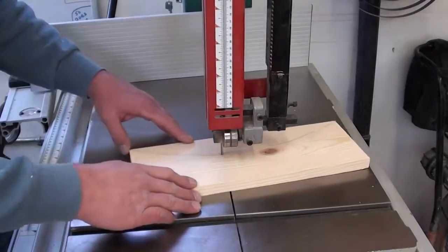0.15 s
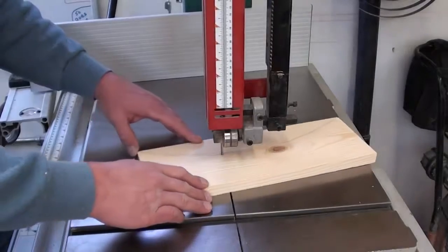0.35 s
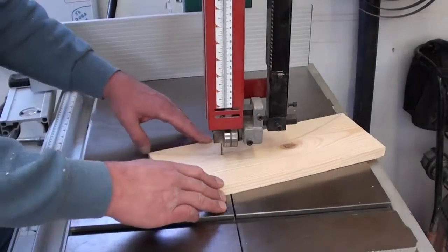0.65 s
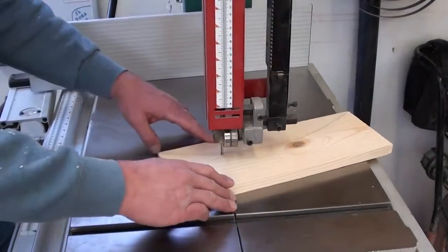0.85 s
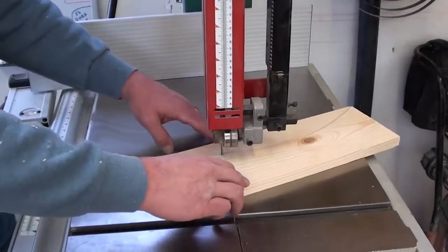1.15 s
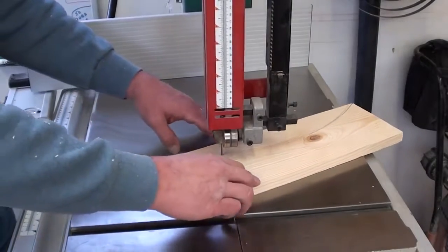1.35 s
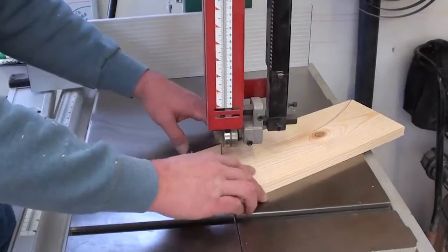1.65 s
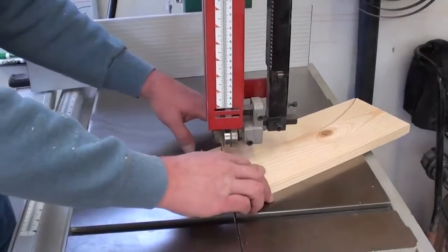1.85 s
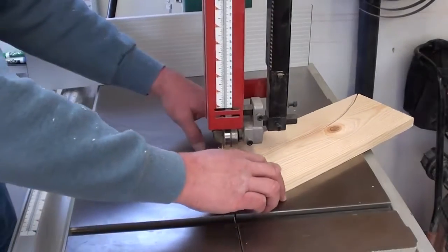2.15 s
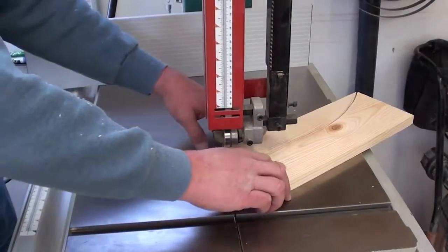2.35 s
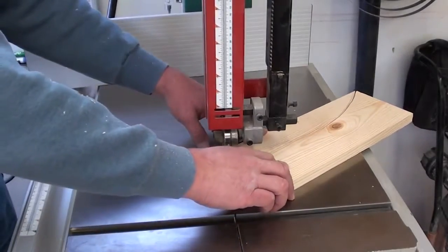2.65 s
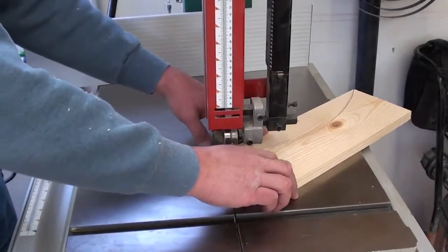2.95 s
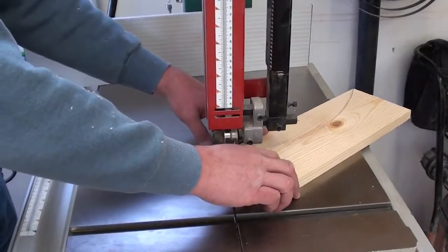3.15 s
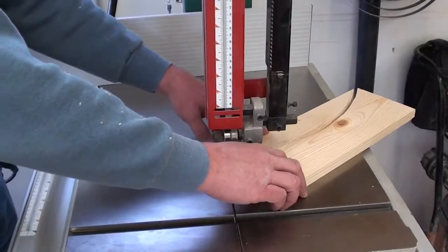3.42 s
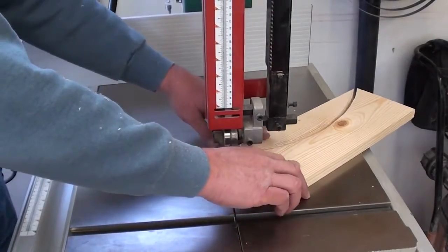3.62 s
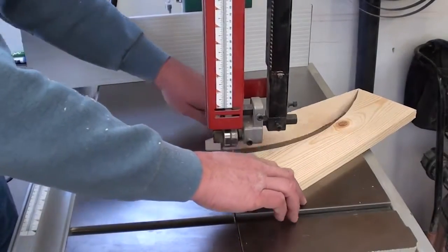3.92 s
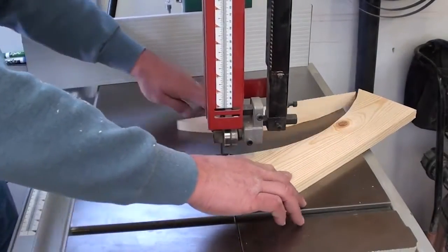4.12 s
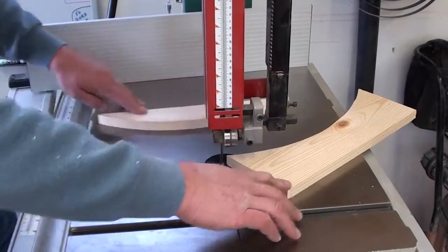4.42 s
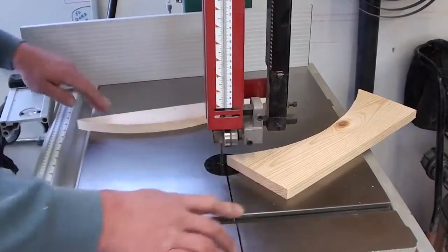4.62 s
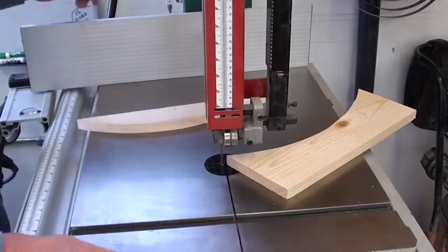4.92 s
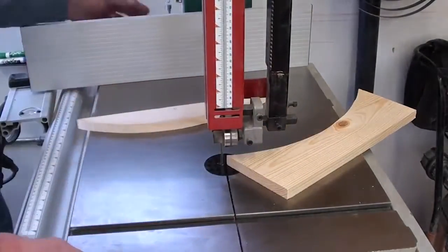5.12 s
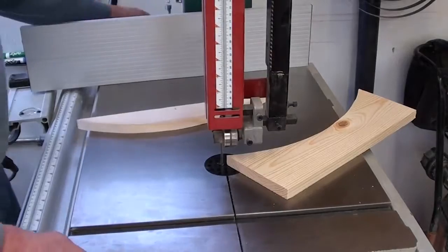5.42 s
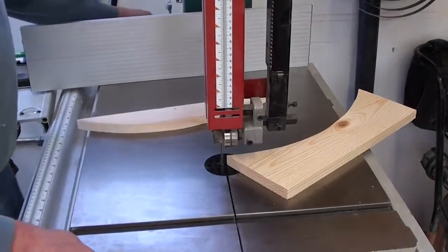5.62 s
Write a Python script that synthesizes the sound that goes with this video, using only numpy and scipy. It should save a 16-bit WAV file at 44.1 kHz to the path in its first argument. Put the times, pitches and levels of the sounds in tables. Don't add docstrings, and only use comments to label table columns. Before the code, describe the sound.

Near microphone, almost mono, lightly reflective workshop. First a speeded-up bandsaw whines and hisses harshly, with binding squeals growing stronger. An abrupt change brings true-speed sawing, lower and rougher, with small grainy crackles. After the cut ends, the motor hums more openly under fluttering blade hiss, wood rubs softly on metal, and finally a switch knocks heavily.

```python
import sys
import numpy as np
from scipy import signal
from scipy.fft import rfft, irfft, next_fast_len
from scipy.io import wavfile

SR = 44100
rng = np.random.default_rng(int(sys.argv[2]) if len(sys.argv) > 2 else 0)


def gain_from_decibels(decibels):
    exponent = np.asarray(decibels, float) / 20
    return 10 ** exponent


def materialize(psi):
    bounded = np.clip(np.atleast_2d(psi).T, -1, 1)
    quanta = np.round(bounded * 32767).astype(np.int16)
    wavfile.write(sys.argv[1], SR, quanta)


N = 254451

FAST_SPEED, NORMAL_SPEED = 4.9735, 1
SPLICE_S, EXIT_S, OFF_S = 2.2972, 3.24, 5.59
HUM_HZ = 119.925
TOOTH_HZ, GUIDE_HZ, LOOP_HZ, WHEEL_HZ = 682, 77.4, 2.38, 47.5
KERF_SPLIT_HZ, KERF_WIDTH_HZ = 13800, 380
KERF_SHOVE = 2.8

# multiple [of HUM_HZ], level_db [dB re the 4th]
HUM_HARMONICS = [(1, -26), (2, -24), (3, -23), (6, -24), (7, -35), (8, -20), (9, -31), (10, -35), (11, -39)]
# time_s [s], fourth_db [dB]
MACHINE_LEVEL = [(0.0, -26.5), (0.55, -28), (0.95, -25.5), (1.3, -24), (1.62, -22), (2.29, -23.5)]
# true_hz [Hz], width_hz [Hz], fast_db [dB], normal_db [dB]
FRAME_MODES = [(99.4, 11, -36, -42), (141.2, 7.9, -21.5, -16), (155, 9.3, -21.5, -15.5),
               (244, 17, -16.5, -13), (272, 21, -26, -7), (305, 11, -15, -12), (308, 6.5, -11, -21),
               (327.7, 21, -13, -18), (443, 8.2, -14, -15.5), (500.8, 34, -4.5, 0.5), (550, 51, -16, -13.5),
               (616.6, 38, -10, -3), (675, 23, -11, -32), (724, 31, -59, -14)]
# true_hz [Hz], fast_db [dB], normal_db [dB]
FRAME_BED = [(8, -40, -30), (40, -42.5, -38), (99, -37, -31.5), (202, -32, -24), (420, -23, -16),
             (826, -30.5, -16.5), (1270, -28, -47), (2450, -60, -55.5)]
# true_hz [Hz], fast_db, normal_db [dB re the frame level]
SHAFT_TONES = [(235.3, -11, -10), (267.6, -30, -11), (298.3, -21, -8), (325.5, -17, -15), (661.2, -15, -8)]
# multiple [of TOOTH_HZ], level_db [dB re the cut]
TOOTH_HARMONICS = [(2, -16.5), (3, -32), (4, -22), (5, -15.5), (6, -18), (7, -20), (8, -18), (10, -16),
                   (15, -38)]
# time_s [s], cut_db [dB]
FEED_LEVEL = [(0.0, -37), (0.6, -39), (1.2, -36), (1.5, -32.5), (1.9, -30), (2.15, -27.5), (2.29, -29)]
# centre_s [s], length_s [s], level_db [dB]
SHOVES = [
    (0.01, 0.026, 0),
    (0.098, 0.018, 2),
    (0.197, .05, 4.5),
    (0.68, 0.02, 3.5),
    (0.783, 0.02, 1.5),
    (1.595, 0.023, -7),
]

# pitch_hz [Hz], width_hz [Hz], level_db [dB]
FAST_LOW_BED = [(2060, -21), (3500, 8), (3740, -4), (4570, -4), (4950, -1), (6220, -5.5), (7310, -3),
                (8300, -1), (10800, -64), (18300, -120)]
FAST_LOW_MODES = [(4770, 15, -3), (4900, 40, 2), (5300, 60, 3), (6740, 56, -29), (7460, 160, 7)]
FAST_RING_BED = [(4590, -17), (7800, 1.5), (8110, 0.5), (8640, 0.5), (9030, 3), (10000, 5.5), (10700, -6),
                 (11900, -6), (15500, -32), (22000, -120)]
FAST_RING_MODES = [(8110, 86, -8), (8900, 170, 10.5), (8900, 58, -13), (9660, 89, -11), (10200, 57, 10)]
FAST_SQUEAL_BED = [(6760, -29), (11500, -5.5), (12900, -11), (13300, -2), (13700, -10), (14400, -10)]
FAST_SQUEAL_MODES = [(12800, 330, -3), (14100, 29, -10)]
FAST_TOP_BED = [(8290, -44), (14100, -10), (15500, -1)]
FAST_TOP_MODES = [(14300, 200, -1), (15000, 81, -2), (15300, 60, 0), (15500, 80, 0)]

# time_s [s], pitch_hz [Hz], level_db [dB]
KERF_GLIDE = [(0.0, 15300, -35), (0.3, 15400, -40), (0.55, 15300, -39), (0.7, 15300, -33),
              (0.82, 13200, -34), (1.0, 13100, -28), (1.2, 13400, -27.5), (1.3, 13100, -26),
              (1.5, 12840, -26), (1.7, 12800, -30.5), (1.88, 12900, -31), (2.05, 12800, -30),
              (2.17, 12400, -29.5), (2.29, 12200, -25)]
# centre_s [s], length_s [s], pitch_hz
# [Hz], width_hz [Hz], level_db [dB]
FAST_FLARES = [(1.02, .18, 4910, 40, -43), (1.66, .04, 5180, 30, -39), (1.45, .07, 5170, 30, -43),
               (1.56, .04, 5060, 30, -39), (1.5, .14, 4900, 35, -41), (1.83, .08, 4900, 30, -40),
               (2.05, .12, 4880, 50, -40), (1.05, .1, 5170, 40, -45), (.19, .03, 5400, 25, -43),
               (.2, .03, 5030, 20, -41), (.53, .035, 5060, 20, -41), (.1, .12, 14130, 30, -43),
               (.75, .15, 15250, 200, -36), (1.05, .15, 14420, 80, -40), (2.2, .1, 11400, 300, -36),
               (2.12, .08, 6000, 1200, -36), (1.64, .1, 2510, 60, -29), (1.5, .12, 1620, 30, -41),
               (1.82, .06, 1620, 30, -40)]
# start_s [s], end_s [s], pitch_hz [Hz], level_db [dB], overtone_db [dB]
SQUEALS = [
    (0.208, .57, 2553, -29, -17.5),
    (.85, 1.15, 2503, -35, -22),
    (1.524, 1.78, 2533, -29.5, -11),
    (4.062, 4.414, 1570, -38, -24),
]

# time_s [s], share [0-1]
BITE = [
    (2.3, 0.95),
    (3.36, 1),
    (3.47, 0.07),
    (5.77, 0.06),
]
# pitch_hz [Hz], width_hz [Hz], level_db [dB]
BOARD_BED = [(530, 31), (900, -10), (1330, -10), (1610, -6), (1990, -1.5), (2650, -4.5), (3060, -6),
             (3310, -8), (4300, 0), (5590, -22), (9460, -120)]
BOARD_MODES = [(1470, 14, -9), (1984, 32, -2), (2267, 25, 5), (2528, 130, -3.5), (3425, 20, 0),
               (3350, 130, -18)]
TABLE_BED = [(530, -16), (900, -2), (980, -16), (1010, -2), (1460, -6), (1970, -1), (2150, -10),
             (2600, -8.5), (3250, -6), (4300, -4), (5590, -29), (9460, -120)]
TABLE_MODES = [(2038, 21, 1), (2457, 48, -2.5), (3440, 260, -9), (3620, 23, -7)]
GUIDE_BED = [(2180, -40), (3700, -14), (3930, -11.5), (4260, -3.5), (4710, -2), (5360, -2), (6030, -6),
             (6400, -5), (8320, -25), (14100, -120)]
GUIDE_MODES = [(4835, 100, -1.5), (5170, 66, 0)]
LOADED_BLADE_BED = [(3530, -35), (6000, -6.5), (6740, -1.5), (7480, -4), (8090, -3), (10500, -3.5),
                    (10700, -12), (11300, -7), (14700, -45), (22000, -120)]
LOADED_BLADE_MODES = [(6370, 130, -1), (6820, 18, -1), (7810, 37, -13), (9000, 130, -19), (9700, 52, -10)]
FREE_BLADE_BED = [(3530, -37), (6000, -18), (6310, -10), (6900, -1.5), (7480, -3), (8560, 4), (10100, -7),
                  (10500, -4), (10900, -4.5), (11300, -10), (14700, -46), (22000, -120)]
FREE_BLADE_MODES = [(7100, 230, -1), (7300, 51, -7), (7900, 65, -13), (8500, 55, -14), (8300, 36, 4),
                    (9260, 120, 3), (10090, 210, 1), (10630, 150, -1)]
LOADED_TOP_BED = [(6410, -30), (10900, -10), (11200, -10), (11900, 1), (12900, -2), (13300, 2), (14100, -6),
                  (14300, -11), (15500, -9)]
FREE_TOP_BED = [(6410, -36), (10900, -12), (11300, -22), (11600, -6), (12400, -1), (13700, -6),
                (13900, -14), (14300, -11), (15500, -20)]
FREE_TOP_MODES = [(12000, 78, 8), (12250, 60, 8.5), (13100, 97, -6)]

# centre_s [s], length_s [s], pitch_hz [Hz],
# width_hz [Hz], level_db [dB]
FLARES = [(2.38, .012, 1500, 260, -26), (2.68, 0.016, 1900, 350, -25), (2.89, .015, 1500, 470, -25),
          (3.2, .15, 6520, 90, -27), (2.93, .06, 6600, 120, -30), (2.78, 0.14, 2650, 150, -26),
          (3.15, .07, 2800, 250, -25.5), (4.85, .2, 7000, 250, -30), (5.25, .15, 6950, 200, -31),
          (5.72, .05, 7000, 250, -29), (3.95, .12, 9200, 350, -30), (4.3, .15, 8700, 500, -29),
          (4.85, .12, 4600, 400, -31), (2.6, .05, 4100, 25, -32), (3.33, .04, 4780, 25, -32),
          (3.35, .04, 2270, 25, -30), (3.37, .03, 2030, 30, -30), (4.22, .1, 2040, 20, -38),
          (4.42, .03, 1780, 40, -37), (5.42, .16, 261, 4, -34)]
# centre_s [s], length_s [s], multiple [of TOOTH_HZ], level_db [dB]
KNOTS = [(2.35, .06, 5, -31.5), (2.528, 0.074, 5, -29), (2.8, .05, 5, -32), (3.023, 0.043, 5, -28),
         (3.304, .07, 5, -28), (2.5, .03, 8, -31), (2.63, .04, 8, -32), (2.75, 0.033, 8, -30),
         (2.99, .045, 8, -26.5), (3.15, .04, 8, -34), (3.37, 0.045, 8, -29), (2.32, .04, 10, -29),
         (2.56, .09, 10, -26), (2.77, .02, 10, -31), (3.02, .05, 10, -29), (3.18, .03, 10, -32),
         (3.29, 0.028, 10, -33)]
# time_s [s], level_db [dB]
SLIDE_LEVEL = [
    (2.3, -66),
    (4.02, -65),
    (4.08, -31.5),
    (4.36, -37),
    (4.45, -55),
    (5.77, -72),
]
# centre_s [s], length_s [s], level_db [dB]
RUBS = [
    (4.24, 0.23, 2.5),
    (4.833, 0.096, 4.5),
    (5.204, 0.17, 2),
]
# start_s [s], peak_db [dB], t60_s [s]
SWITCH_BLOWS = [
    (5.601, -15.5, 0.47),
    (5.63, -24, 0.47),
    (5.663, -17, 0.47),
    (5.71, -23, 0.4),
]
# pitch_hz [Hz], width_hz [Hz], level_db [dB]
CLUNK_MODES = [(334, 72, -3.5), (530, 220, -4.5), (592, 54, 1.5), (870, 120, -15), (1490, 140, -20),
               (1850, 150, -18)]
# start_s [s], pitch_hz [Hz], level_db [dB], t60_s [s]
THUDS = [
    (5.611, 155, -20.5, 0.3),
    (5.624, 252, -18, 0.17),
    (5.71, 155, -24.5, .4),
]
# true_hz [Hz], side_db [dB re mid]
SIDE_LEVEL = [(60, -39), (200, -29.5), (500, -28), (1100, -20.5), (2500, -19.5), (5000, -19.5),
              (8000, -21.5), (13000, -44)]


def at_hz(points, hz):
    table_hz, level_db = np.array(points).T
    return np.interp(np.log(hz), np.log(table_hz), level_db)


def in_time(rows, t):
    s, *columns = np.transpose(rows)
    return [np.interp(t, s, c) for c in columns]


def bump(t, centre, length):
    return np.exp(-((t - centre) / length) ** 2)


def drift(t, rate):
    r = np.exp(-64 * np.pi * rate / SR)
    noise = rng.standard_normal(len(t) // 32 + 1502)
    slow = signal.lfilter([1], [1, -2 * r, r * r], noise)[1500:]
    return np.interp(np.arange(len(t)) / 32, np.arange(len(slow)), slow / slow.std())


def throb(t, hz, depths):
    gain = 1
    for k, depth in enumerate(depths, 1):
        gain = gain + depth * np.cos(2 * np.pi * k * (hz * t + rng.random()))
    return gain


def centred(mono):
    return np.array([mono, mono])


def waver(t, hz, db, sway, sway_db, rate):
    phase = 2 * np.pi * (hz * t + rng.random()) + sway * drift(t, rate)
    return np.sqrt(2) * gain_from_decibels(db + sway_db * drift(t, rate)) * np.sin(phase)


def band(hz, width_hz):
    low_pass = signal.butter(4, width_hz, fs=SR, output="sos")
    slow = signal.sosfilt(low_pass, rng.standard_normal((2, 2, len(hz))))
    turn = 2 * np.pi * np.cumsum(hz) / SR
    out = slow[0] * np.cos(turn) + slow[1] * np.sin(turn)
    return out / out.std()


def ripple(hz, size):
    age = np.arange(SR // 5) / SR
    echoes = rng.standard_normal(len(age)) * gain_from_decibels(-60 * age / 0.083)
    echoes = echoes / np.sqrt(np.sum(echoes ** 2))
    share = gain_from_decibels(-0.5) / (1 + (900 / hz) ** 4)
    return abs(1 + share * rfft(echoes, size)) / np.sqrt(1 + share ** 2)


def rings(t, edges, bed, modes, modes_db, patchy_db, patch_rate):
    size = next_fast_len(len(t))
    hz = np.maximum(np.arange(size // 2 + 1) * SR / size, 1)
    power = gain_from_decibels(2 * at_hz(bed, hz))
    for f, width, db in modes:
        power = power + gain_from_decibels(2 * (db + modes_db)) / (1 + (2 * (hz - f) / width) ** 2) ** 2
    power = power / (1 + (edges[0] / hz) ** 30) / (1 + (hz / edges[1]) ** 30)
    ridges = [ripple(hz, size), ripple(hz, size), np.ones_like(hz)]
    shaped = rfft(rng.standard_normal((3, size))) * np.sqrt(power) * ridges

    turn = 1.59 * drift(t, patch_rate / 11)
    together = drift(t, patch_rate / 2)
    low, high = np.log2(edges)
    third = np.maximum(3 * np.log2(hz), 17)
    out = 0
    for k in range(max(int(3 * low) - 1, 17), int(3 * high) + 3):
        share = np.clip(1 - abs(third - k), 0, 1)
        one, other, side = irfft(shaped * share, size)[:, :len(t)]
        mid = one * np.cos(turn) + other * np.sin(turn)
        gain = gain_from_decibels(patchy_db * (0.4 * together + drift(t, patch_rate)))
        out = out + gain * np.array([mid, side])
    return out / np.sqrt(np.mean(out[0] ** 2))


def motor(t, speed, fourth_db, fifth_db):
    turn = 2 * np.pi * HUM_HZ * speed * t
    fifth_swing = 1.02 * (fifth_db - fifth_db.mean())
    levels = [(4, fourth_db), (5, fifth_db)]
    levels += [(k, fourth_db.mean() + db + fifth_swing) for k, db in HUM_HARMONICS]
    lag = np.array([[0], [1.1]])
    hum = sum(gain_from_decibels(db) * np.sin(k * turn + 2 * np.pi * rng.random() - lag) for k, db in levels)
    return np.sqrt(2) * hum


def frame(t, speed, column, level_db):
    modes = [(row[0] * speed, row[1] * speed, row[column + 1]) for row in FRAME_MODES]
    bed = [(row[0] * speed, row[column]) for row in FRAME_BED]
    panels = rings(t, (4, 750 * speed + 400), bed, modes, 0.075, 1.0, 7.68)
    panels = throb(t, LOOP_HZ * speed, [0.016, 0.2, 0.024, 0.054]) * panels
    tones = sum(waver(t, row[0] * speed, row[column], 0.48, 2.5, 2.7 * speed) for row in SHAFT_TONES)
    return gain_from_decibels(level_db) * (panels + gain_from_decibels(-3.5) * centred(tones))


def teeth(t, speed, cut_db):
    heard = [(k * TOOTH_HZ * speed, db) for k, db in TOOTH_HARMONICS]
    return centred(sum(waver(t, hz, cut_db + db - 3.0, 0.87, 5.16, 4 * speed)
                       for hz, db in heard if hz < SR / 3))


def fast_levels(t):
    fourth, = in_time(MACHINE_LEVEL, t)
    feed, = in_time(FEED_LEVEL, t)
    hz, kerf = in_time(KERF_GLIDE, t)
    shove = sum(db * bump(t, s, length) for s, length, db in SHOVES)
    fifth = fourth - 2.5
    panels = fourth - 4.5 + 0.16 * shove
    cut = feed + np.maximum(shove, 0)

    high = 1 / (1 + np.exp((KERF_SPLIT_HZ - hz) / KERF_WIDTH_HZ))
    note = gain_from_decibels(2 * (kerf + KERF_SHOVE * np.minimum(shove, 0)))
    squeal = 10 * np.log10(note * (1 - high) + gain_from_decibels(2 * -35))
    top = 10 * np.log10(note * high + gain_from_decibels(2 * -40))
    ring = -29 + 0.19 * (feed - feed.mean()) - 0.44 * (squeal - squeal.mean()) + shove
    return fourth, fifth, panels, cut, ring, squeal, top


def fast_stretch(t):
    fourth, fifth, panels, low, ring, squeal, top = fast_levels(t)
    hum = motor(t, FAST_SPEED, fourth, fifth)
    body = frame(t, FAST_SPEED, column=1, level_db=panels + 0.5)
    cut = gain_from_decibels(low - 0.3) * rings(t, (3650, 7950), FAST_LOW_BED, FAST_LOW_MODES, 1.0, 1.0, 15.0)
    board = gain_from_decibels(ring + 0.95) * rings(t, (7950, 11600), FAST_RING_BED, FAST_RING_MODES, 1.5, 1.0, 18.0)
    board += gain_from_decibels(squeal - 1.5) * rings(t, (11600, 14200), FAST_SQUEAL_BED, FAST_SQUEAL_MODES, 1.5, 0.57, 20)
    board += gain_from_decibels(top + 4.0) * rings(t, (14200, 17000), FAST_TOP_BED, FAST_TOP_MODES, 1.5, 0.98, 22)
    beat = throb(t, LOOP_HZ * FAST_SPEED, [.08, .03, .05]) * throb(t, WHEEL_HZ * FAST_SPEED, [.09])
    return hum + body + cut + beat * board + teeth(t, FAST_SPEED, low + 3)


def kerf_note(t):
    hz, db = in_time(KERF_GLIDE, t)
    pause = sum(min(shove, 0) * bump(t, s, length) for s, length, shove in SHOVES)
    low = 1 / (1 + np.exp((hz - KERF_SPLIT_HZ) / KERF_WIDTH_HZ))
    level = gain_from_decibels(db - 4 + KERF_SHOVE * pause + 3.5 * drift(t, 14))
    return low * level * band(np.minimum(hz, 13440), 290)


def flares(t, table):
    out = np.zeros((2, len(t)))
    for s, length, hz, width_hz, db in table:
        noise = band(np.full(SR, hz), width_hz)
        near = np.flatnonzero(abs(t - s) < .5)[:SR]
        out[:, near] += gain_from_decibels(db) * bump(t[near], s, length) * noise[:, :len(near)]
    return out


def squeals(t):
    out = 0
    for start, end, hz, db, overtone_db in SQUEALS:
        swell = np.sin(np.pi * np.clip((t - start) / (end - start), 0, 1)) ** 0.15
        out = out + swell * waver(t, hz, db, 1.3, 1.5, 9)
        out = out + swell * waver(t, 2 * hz, db + overtone_db, 1.9, 5.3, 15.0)
    return centred(out)


def slow_levels(t, bite):
    def loaded(wood_db, free_db):
        return free_db + (wood_db - free_db) * bite

    free, off = np.maximum(t - EXIT_S, 0), np.maximum(t - OFF_S, 0)
    tear = -0.5 * bump(t, EXIT_S - .09, .09)
    settle = (1 - bite) * 6 * np.exp(-free / 0.38)
    jolt = 7.5 * np.minimum(off / 0.015, 1) * np.exp(-off / 0.14)
    rub = sum(db * bump(t, s, length) for s, length, db in RUBS)
    fourth = loaded(-24.5, -17.5) - 1.2 * free - 300 * off
    fifth = loaded(-27, -22) - 430 * np.maximum(off - 0.04, 0)
    panels = loaded(-32.5, -30) + 0.43 * free
    board = loaded(-19.5, -30.5) + tear + settle + jolt + rub
    guides = loaded(-23.5, -24.5) + tear + free
    blade = loaded(-19.5, -20.5) + 0.33 * free
    return fourth, fifth, panels, board, guides, blade, loaded(-30, -28)


def slow_stretch(t):
    bite = np.clip(in_time(BITE, t)[0], 0, 1)
    fourth, fifth, panels, board, guides, blade, top = slow_levels(t, bite)
    wood, free = np.sqrt(bite), np.sqrt(1 - bite)

    machine = motor(t, NORMAL_SPEED, fourth, fifth)
    machine = machine + frame(t, NORMAL_SPEED, column=2, level_db=panels + 2.5)
    cut = wood * rings(t, (900, 4000), BOARD_BED, BOARD_MODES, 4.5, 0.78, 10.7)
    cut += free * rings(t, (900, 4000), TABLE_BED, TABLE_MODES, 2.0, 0.74, 11.3)
    steel = wood * rings(t, (6150, 11100), LOADED_BLADE_BED, LOADED_BLADE_MODES, 1.5, 0.79, 11.8)
    steel += free * rings(t, (6150, 11100), FREE_BLADE_BED, FREE_BLADE_MODES, .3, 0.86, 15.3)
    edge = wood * rings(t, (11100, 17000), LOADED_TOP_BED, [(13640, 60, -6)], .1, 0.87, 13)
    edge += free * rings(t, (11100, 17000), FREE_TOP_BED, FREE_TOP_MODES, .5, 0.5, 11.5)

    bearings = rings(t, (4000, 6150), GUIDE_BED, GUIDE_MODES, .3, 0.54, 16.8)
    hiss = gain_from_decibels(guides - 1.5) * throb(t, GUIDE_HZ, [.07, .03]) * bearings
    hiss += gain_from_decibels(blade - 1.02) * throb(t, GUIDE_HZ, [0.097, 0.12, 0.064, .03, .06]) * steel
    hiss += gain_from_decibels(top - 1.5) * throb(t, GUIDE_HZ, [0.072, .06, .03, 0.14, .11]) * edge
    hiss += free * centred(waver(t, 8 * TOOTH_HZ, guides - 18, 1.9, 3.2, 5.1))
    slide = gain_from_decibels(in_time(SLIDE_LEVEL, t)[0]) * rings(t, (1300, 2200), TABLE_BED, [], .1, 1.2, 26)
    bites = bite * teeth(t, NORMAL_SPEED, board - 1.5)
    return machine + gain_from_decibels(board - 0.5) * cut + hiss + slide + bites + switch(t) + thuds(t)


def knots(t):
    return flares(t, [(s, length, k * TOOTH_HZ, 12.6, db) for s, length, k, db in KNOTS])


def switch(t):
    shake = 0
    for s, db, t60 in SWITCH_BLOWS:
        age = np.maximum(t - s, 0)
        shake = shake + (gain_from_decibels(db - 60 * age / t60) * np.minimum(age / 0.0031, 1)) ** 2
    cabinet = rings(t, (90, 2700), [(90, -23), (600, -15), (3500, -41)], CLUNK_MODES, .1, 1.2, 31)
    return np.sqrt(shake) * cabinet


def thuds(t):
    out = 0
    for s, hz, db, t60 in THUDS:
        age = np.maximum(t - s, 0)
        swell = np.minimum(age / 0.0091, 1)
        out = out + gain_from_decibels(db - 60 * age / t60) * swell * np.sin(2 * np.pi * hz * age)
    return centred(np.sqrt(2) * out)


def narrowed(sound, speed):
    mid, side = sound
    size = next_fast_len(len(side))
    hz = np.maximum(np.arange(size // 2 + 1) * SR / size, 1)
    weak = irfft(rfft(side, size) * gain_from_decibels(at_hz(SIDE_LEVEL, hz / speed) + 2.0), size)
    return np.array([mid, weak[:len(side)]])


def scene():
    t, join = np.arange(N) / SR, round(SPLICE_S * SR)
    early, late = t[:join], t[join:]
    fast = fast_stretch(early) + kerf_note(early) + flares(early, FAST_FLARES) + squeals(early)
    slow = slow_stretch(late) + knots(late) + flares(late, FLARES) + squeals(late)
    mid, side = np.hstack([narrowed(fast, FAST_SPEED), narrowed(slow, NORMAL_SPEED)])
    return np.array([mid + side, mid - side])


def top_cut(x):
    return signal.sosfilt(signal.butter(12, 15660, fs=SR, output="sos"), x)


def record(dry):
    mix = 1.245 * np.tanh(dry / 1.155)
    return top_cut(mix)


dry = scene()
out = record(dry)
materialize(out)
```